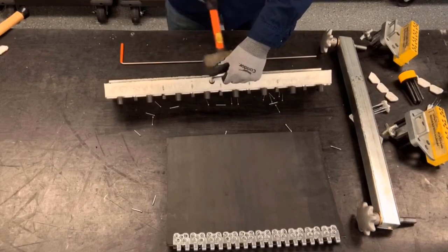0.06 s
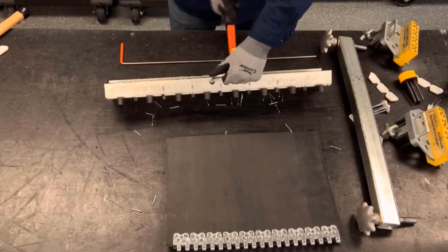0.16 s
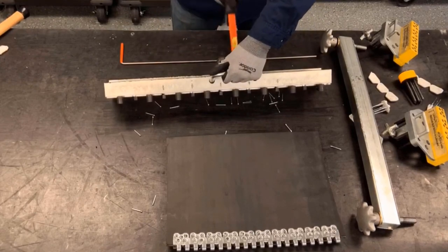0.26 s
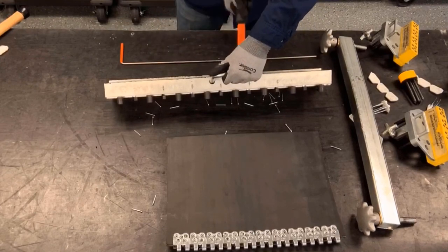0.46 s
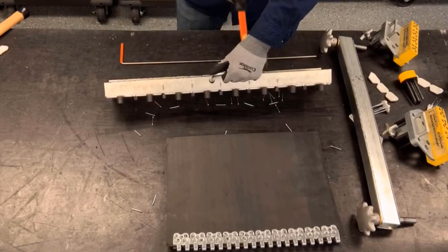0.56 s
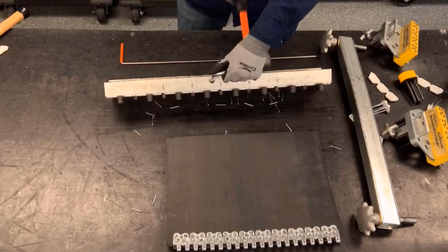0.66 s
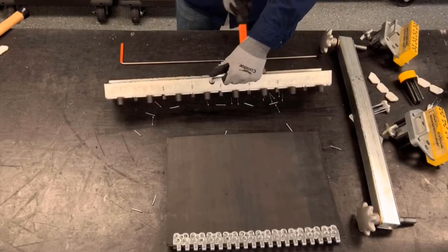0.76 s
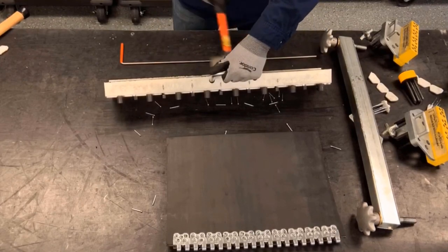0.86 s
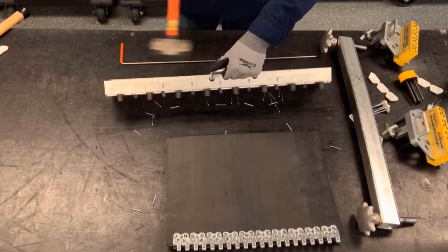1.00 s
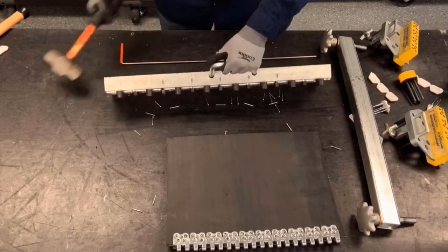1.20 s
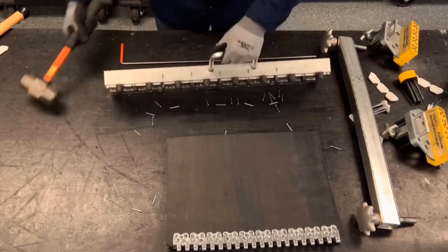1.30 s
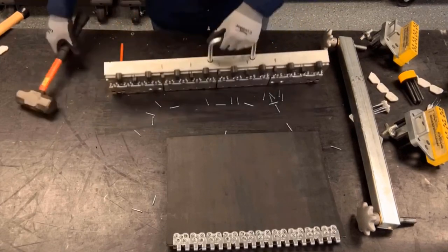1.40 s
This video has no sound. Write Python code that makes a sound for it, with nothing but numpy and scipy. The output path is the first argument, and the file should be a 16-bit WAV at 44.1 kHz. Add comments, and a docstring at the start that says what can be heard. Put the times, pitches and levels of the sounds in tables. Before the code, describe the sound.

Three sharp hammer blows ring on a metal rail in a workshop, the loudest slightly overloading the microphone. The rail bounces on the bench and loose metal clinks after each hit, then only quiet room hum remains.

```python
"""A hammer drives a punch into a metal rail on a workbench: three blows, an earlier one still dying.
Each blow pings, rings the rail, thumps the bench and shakes loose metal; the rail bounces a few times.
A small part is left ringing. The workshop echoes over quiet noise, hum and a motor tone.
The loudest swings clip."""
import sys
import numpy as np
from scipy import signal
from scipy.fft import rfft, irfft, next_fast_len
from scipy.io import wavfile

SR = 44100
rng = np.random.default_rng(int(sys.argv[2]) if len(sys.argv) > 2 else 0)


def dump_mix(stems):
    """Bounce the given channels to the path in sys.argv[1] as a 16-bit WAV at rate SR."""
    frames = np.atleast_2d(stems).T  # one column per channel
    limited = np.clip(frames, -1, 1)  # hard clip at full scale
    pcm = np.round(limited * 32767).astype(np.int16)
    wavfile.write(sys.argv[1], SR, pcm)


N = 63945
LEAD_SAMPLES = SR // 8  # holds the blow before time zero

# Room noise spectrum. Each row: frequency in Hz, relative level in dB.
NOISE_SPECTRUM = [(15, -25), (30, 13.5), (60, -4.5), (150, -4.5), (300, -9.5), (591, -13.5), (1000, -20.5),
                  (1650, -29), (2350, -28.5), (5000, -31), (8000, -38.5), (16000, -57.5)]
# Narrow hums. Each row: centre in Hz, width in Hz, RMS level in dB.
HUM_BANDS = [(2000, 470, -77.5)]
# Room decay. Each row: frequency in Hz, T60 in seconds.
ROOM_DECAY = [(60, 0.4), (300, 0.65), (1200, 0.36), (4000, 0.55), (9000, 0.45), (15000, 0.33)]
# Room tail spectrum. Each row: frequency in Hz, relative level in dB.
ROOM_SPECTRUM = [(60, -6), (300, -3.5), (600, 1.5), (1300, -0.2), (3000, 1.5), (8000, -2.15), (15000, 1.5)]
# Small ringing part. Each row: start in seconds, frequency in Hz, level in dB, T60 in seconds.
PART_RINGS = [(.57, 3700, -44, 0.17), (.62, 3700, -59, 0.42), (.69, 3700, -67, 0.69),
              (.86, 2056, -28.5, 0.071), (.95, 3700, -53.5, 0.1)]
# Loose metal spectrum. Each row: frequency in Hz, relative level in dB.
RATTLE_SPECTRUM = [(180, -30.5), (300, -6), (938, -14), (1290, 3), (1660, -6.5), (2930, -10), (4030, -7.5),
                   (6240, -10), (7380, -10), (15200, -34), (16500, -46.5)]
# Loose metal decay. Each row: frequency in Hz, base T60 in seconds (scaled per contact).
RATTLE_DECAY = [(300, 0.23), (1500, 0.081), (5000, 0.099), (12000, 0.1)]
# Far-wall echoes of the bench's low push. Each row: delay in seconds, gain in dB.
WALL_ECHOES = [(0.032, -15), (0.066, -16), (.1, -21.5), (.14, -23)]
# Modes of bench top, rail footing and rail. Each row: frequency in Hz, relative level in dB,
# T60 in seconds.
BENCH_MODES = [(98.5, -8.5, 0.12), (162.9, -6, 0.23), (221, -10.5, 0.087)]
FOOTING_MODES = [(346.4, -2.5, 0.049), (510.3, -13, 0.067), (538.2, -5, 0.059), (729, -10.5, 0.078),
                 (886.3, 1.5, 0.02)]
RAIL_MODES = [(955.3, -9, 0.17), (1159.5, -6, .15), (1305, -0.5, 0.1), (1411, -10, 0.044),
              (1574, -3.5, 0.068), (1523, -8, 0.1), (1715, -9.5, 0.17), (1826, -10.5, .12),
              (2140, -10.5, .2), (2420, -21, .14), (2570, -21.5, .12), (4016, -29.5, 0.11),
              (7460, -18.5, 0.099)]
# Blows and bounces. Each row: start in seconds, ping gain in dB, ping frequency in Hz, ping T60 in
# seconds, gains in dB of rail, bench, push, footing and rattle, then the rattle's T60 factor.
BLOWS_AND_BOUNCES = [(-.06, -19, 1007, .02, -27.5, -27, -59, -22, -30.5, 1.11),
                     (0.23, -52, 2000, 0.0065, -72, -71, -66, -59, -42, 0.45),
                     (0.2319, -8, 1506, 0.01, -22, -31.5, -19, -26, -19.5, 0.85),
                     (0.2334, -18, 2454, 0.013, -41, -43, -28, -34, -46.5, 0.45),
                     (0.2422, -13, 1520, 0.0069, -38, -33, -29, -45, -38, 1.94),
                     (0.244, -20, 1476, .02, -35.5, -33, -43, -37.5, -35.5, .9),
                     (0.513, -27.5, 1041, .012, -27.5, -40.5, -37.5, -30.5, -32, 1.7),
                     (0.5184, -16, 964, .008, -34, -45, -19, -31.5, -44, 0.49),
                     (0.5233, -7.5, 1539, 0.011, -22, -30, -24, -25, -25, 1.06),
                     (0.5276, -42, 1450, .015, -35.5, -28.5, -27.5, -26.5, -26, 0.74),
                     (0.5475, -17.5, 1390, .008, -35.5, -57, -49, -28.5, -35.5, 0.32),
                     (0.8084, -6.5, 1367, 0.0084, -29.5, -42.5, -39, -23, -28, 0.57),
                     (0.8102, -22.5, 4470, 0.017, -49, -50.5, -60, -41, -23, 0.36),
                     (0.8225, -19.5, 836, .006, -30.5, -47.5, -37, -28.5, -34, .9),
                     (0.8292, -15.5, 610, .007, -31, -39, -36.5, -31, -41.5, 0.3),
                     (.849, -18.5, 980, .006, -43, -49, -53, -38.5, -39, 1),
                     (0.8949, -32, 887, .015, -41.5, -43.5, -45, -41.5, -45.5, 1.4),
                     (1.072, -66.5, 2700, .02, -78, -75.5, -81, -70.5, -67.5, .3)]

NOISE_DB, MOTOR_HZ, MOTOR_DB = -63, 293, -68
ROOM_DB, ROOM_DELAY_S = -15, .012
PART_RISE_S, RATTLE_RISE_S, STRIKE_RISE_S, PUSH_RISE_S = .0057, .0013, .00099, .0014
MODE_SCATTER_DB, MODE_FLUTTER_DB, FLUTTER_ONSET_S, MODE_WAVER_FRACTION = 4, 5, .04, .011
PING_SHARP_FRACTION, PING_SETTLE_S = .41, .00067
HIGHPASS_HZ, TOP_HZ, CLIP_LEVEL, CLIP_HARDNESS = 45, 16200, .235, 6


def amp(db):
    return 10 ** (np.asarray(db) / 20)


def unit_rms(x):
    return x / np.sqrt(np.mean(x ** 2) + 1e-20)


def rise(t, tau_s):
    return 1 - np.exp(-t / tau_s)


def along(points, hz):
    """Interpolate (Hz, value) points on a log frequency axis."""
    point_hz, values = np.transpose(points)
    return np.interp(np.log(hz + 1), np.log(point_hz + 1), values)


def filtered(x, gain_at_hz):
    size = next_fast_len(len(x) + 8192)
    return irfft(rfft(x, size) * gain_at_hz(np.fft.rfftfreq(size, 1 / SR)), size)[:len(x)]


def add(track, start_s, x):
    span = track[LEAD_SAMPLES + round(start_s * SR):][:len(x)]
    span += x[:len(span)]


def decaying_noise(samples, decay, spectrum):
    """Coloured noise with a T60 per frequency."""
    hz, t, bins = signal.stft(rng.standard_normal(samples), SR, nperseg=128)
    gain_db = along(spectrum, hz)[:, None] - 60 * t / along(decay, hz)[:, None]
    return signal.istft(bins * amp(gain_db), SR, nperseg=128)[1][:samples]


def background():
    """Room noise, narrow hum and a steady motor tone."""
    noise = filtered(rng.standard_normal(N), lambda f: amp(along(NOISE_SPECTRUM, f)))
    bed = amp(NOISE_DB) * unit_rms(noise)
    for hz, width_hz, db in HUM_BANDS:
        hum = filtered(rng.standard_normal(N), lambda f: 1 / (1 + (2 * (f - hz) / width_hz) ** 2))
        bed += amp(db) * unit_rms(hum)
    return bed + amp(MOTOR_DB) * np.sin(2 * np.pi * MOTOR_HZ * np.arange(N) / SR)


def workshop_reverb(x):
    """Diffuse room tail, drawn anew per contact."""
    tail = decaying_noise(SR * 3 // 4, ROOM_DECAY, ROOM_SPECTRUM)
    return signal.fftconvolve(x[:SR // 4], tail / np.linalg.norm(tail))


def small_part(t, hz, db, t60_s):
    """A small part rings in one damped mode."""
    return amp(db - 60 * t / t60_s) * rise(t, PART_RISE_S) * np.sin(2 * np.pi * hz * t)


def rattle(t, t60_factor):
    """Shaken loose metal: a dying noise burst."""
    burst = decaying_noise(len(t), np.multiply(RATTLE_DECAY, [1, t60_factor]), RATTLE_SPECTRUM)
    return burst / np.std(burst[:400]) * rise(t, RATTLE_RISE_S)


def bench_push(t):
    """One low swing of the bench top, plus its returns from far walls."""
    def swing(delay_s):
        u = np.maximum(t - delay_s, 0) / PUSH_RISE_S
        return u * u * (3 - u) * np.exp(-u)
    return swing(0) + sum(amp(db) * swing(delay_s) for delay_s, db in WALL_ECHOES)


def ring(t, modes):
    """A struck body: damped modes with random level and sign, pitch waver and level flutter."""
    hz, db, t60_s = np.transpose(modes)[:, :, None]
    knots = rng.standard_normal((len(modes), 40))
    drift = np.array([np.interp(t, np.linspace(0, t[-1], 40), row) for row in knots])
    phase = 2 * np.pi * hz * np.cumsum(1 + MODE_WAVER_FRACTION * drift, 1) / SR
    signs = np.sign(knots[:, :1])
    scatter_db = MODE_SCATTER_DB * knots[:, 1:2]
    flutter_db = MODE_FLUTTER_DB * drift[::-1] * np.minimum(t / FLUTTER_ONSET_S, 1)
    envelope = amp(db + scatter_db + flutter_db - 60 * t / t60_s)
    return np.sum(signs * envelope * np.sin(phase), 0)


def punch_ping(t, hz, t60_s):
    """The struck punch: a short tone that starts sharp and settles."""
    envelope = 2 * amp(-60 * (t / t60_s) ** 1.064) * rise(t, STRIKE_RISE_S)
    advance_s = PING_SHARP_FRACTION * PING_SETTLE_S * rise(t, PING_SETTLE_S)
    return envelope * np.sin(2 * np.pi * hz * (t + advance_s))


def contact(t, ping_db, ping_hz, ping_t60_s, rail_db, bench_db, push_db, footing_db,
            rattle_db, rattle_t60_factor):
    """One blow or bounce excites loose metal, punch, rail, bench and footing."""
    return (amp(rattle_db) * rattle(t, rattle_t60_factor)
            + amp(ping_db) * punch_ping(t, ping_hz, ping_t60_s)
            + amp(rail_db) * ring(t, RAIL_MODES) * rise(t, STRIKE_RISE_S)
            + amp(bench_db) * ring(t, BENCH_MODES)
            + amp(push_db) * bench_push(t)
            + amp(footing_db) * ring(t, FOOTING_MODES))


def hammering():
    """All contacts with their room tails, plus the small ringing part."""
    track = np.zeros(N + LEAD_SAMPLES)
    t = np.arange(SR // 2) / SR
    for start_s, *settings in BLOWS_AND_BOUNCES:
        direct = contact(t, *settings)
        add(track, start_s, direct)
        add(track, start_s + ROOM_DELAY_S, amp(ROOM_DB) * workshop_reverb(direct))
    for start_s, hz, db, t60_s in PART_RINGS:
        add(track, start_s, small_part(t, hz, db, t60_s))
    return track[LEAD_SAMPLES:]


def scene():
    return (hammering() + background())[None]


def record(dry):
    """Microphone bass roll-off, input clipping, band limit."""
    x = signal.sosfilt(signal.butter(2, HIGHPASS_HZ, "high", fs=SR, output="sos"), dry[0])
    clipped = x / (1 + np.abs(x / CLIP_LEVEL) ** CLIP_HARDNESS) ** (1 / CLIP_HARDNESS)
    return filtered(clipped, lambda f: np.clip((TOP_HZ + 800 - f) / 1400, 0, 1) ** 3)[None]


dry = scene()
out = record(dry)
dump_mix(out)
```